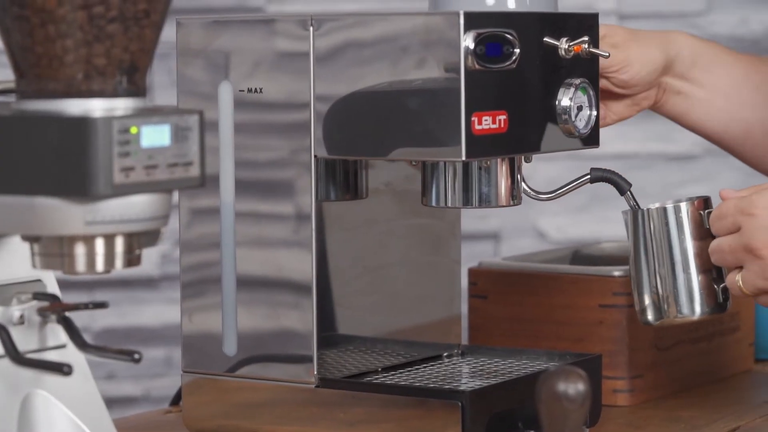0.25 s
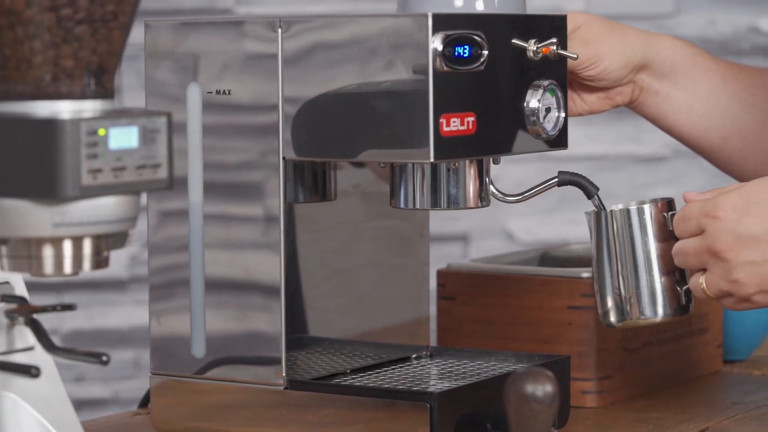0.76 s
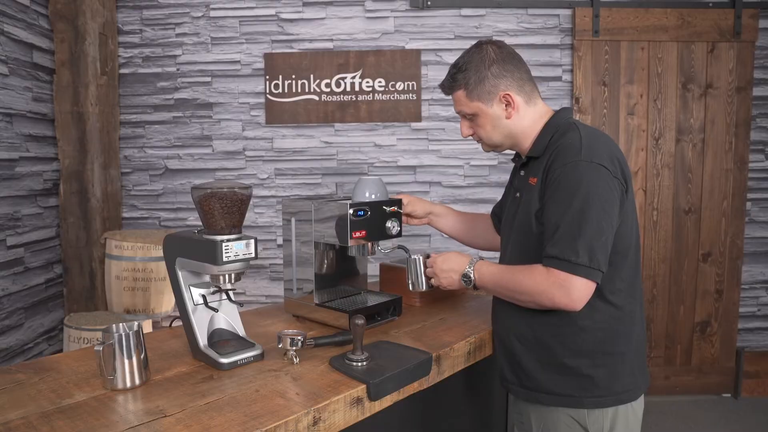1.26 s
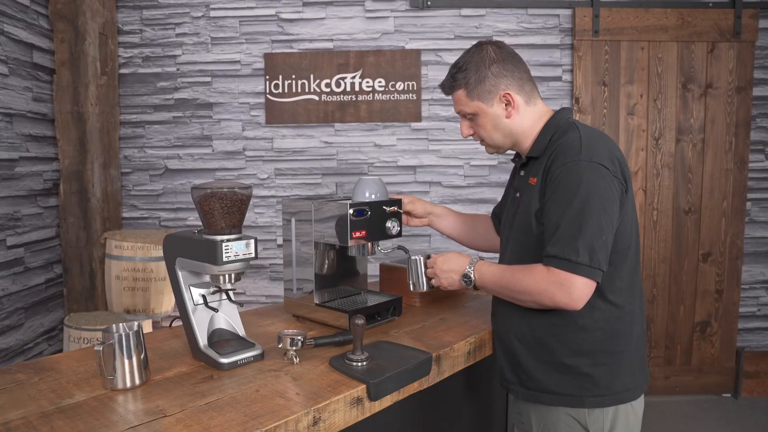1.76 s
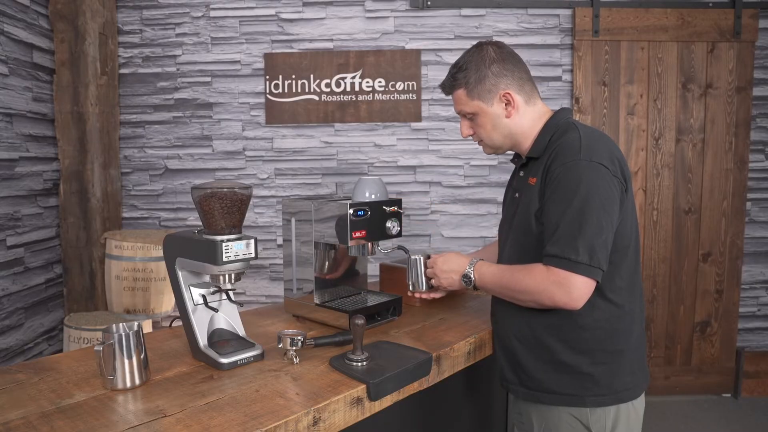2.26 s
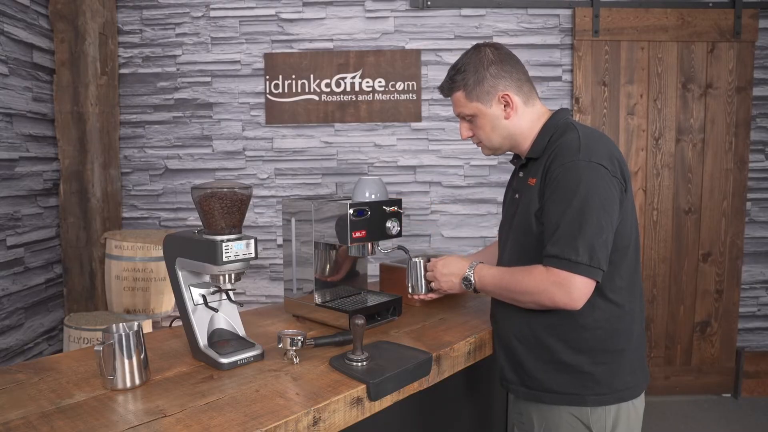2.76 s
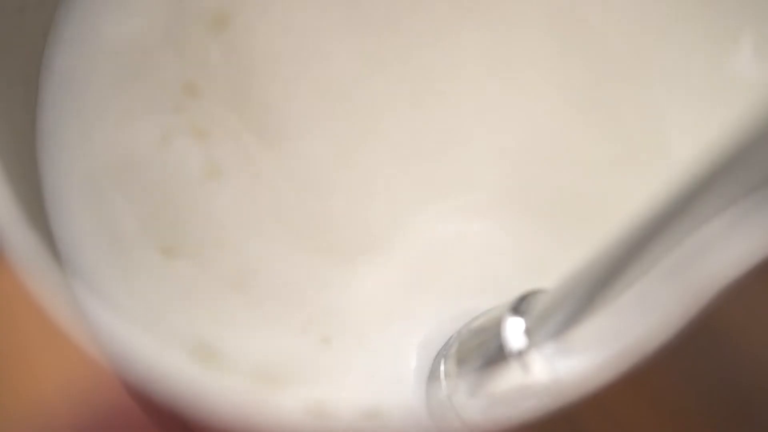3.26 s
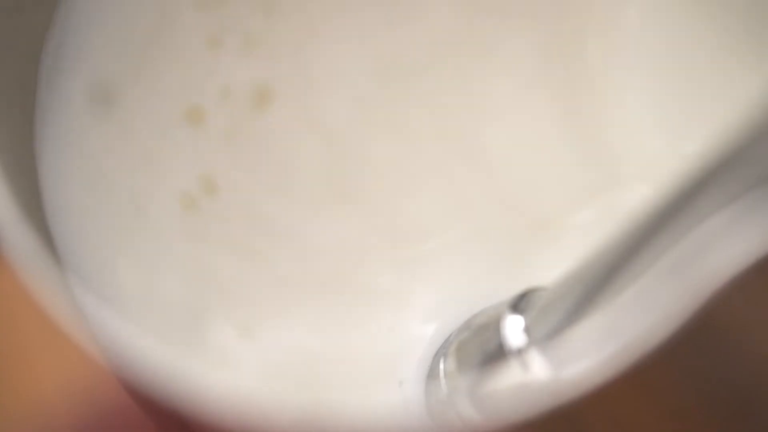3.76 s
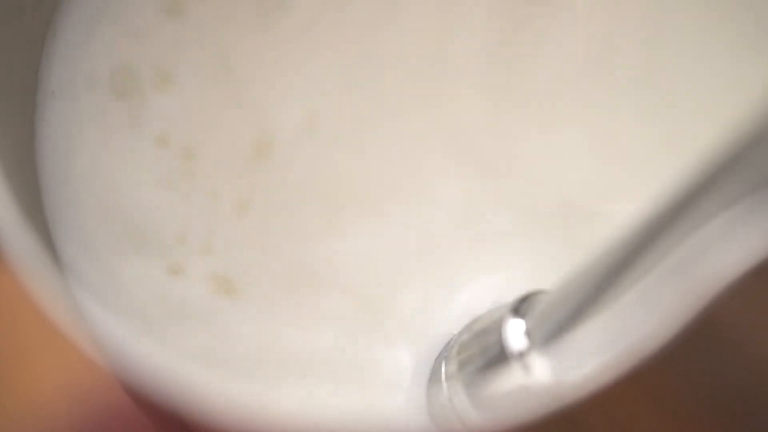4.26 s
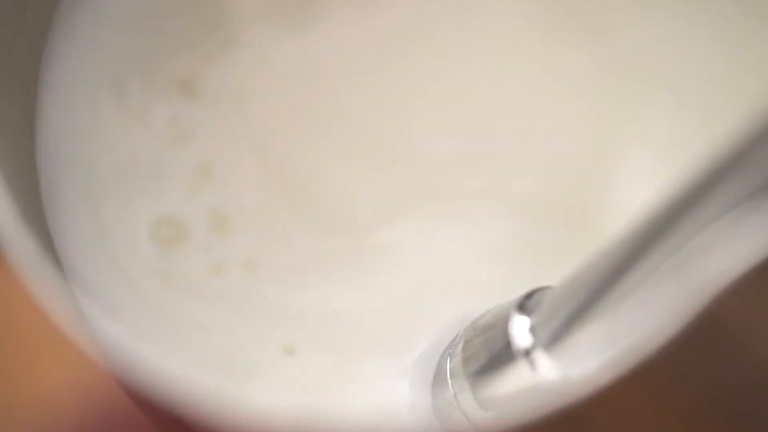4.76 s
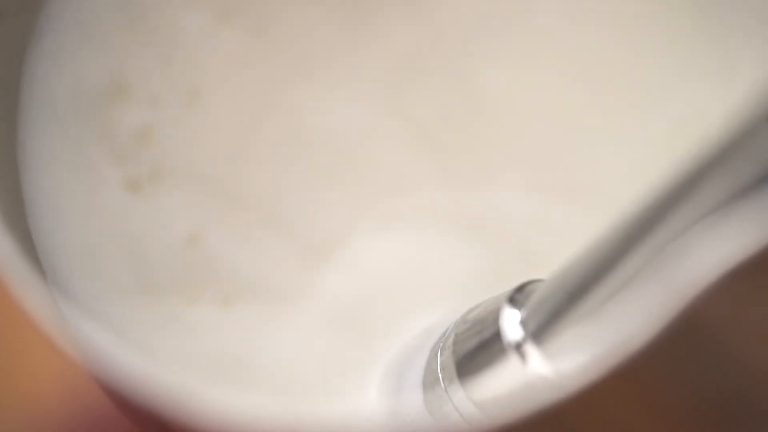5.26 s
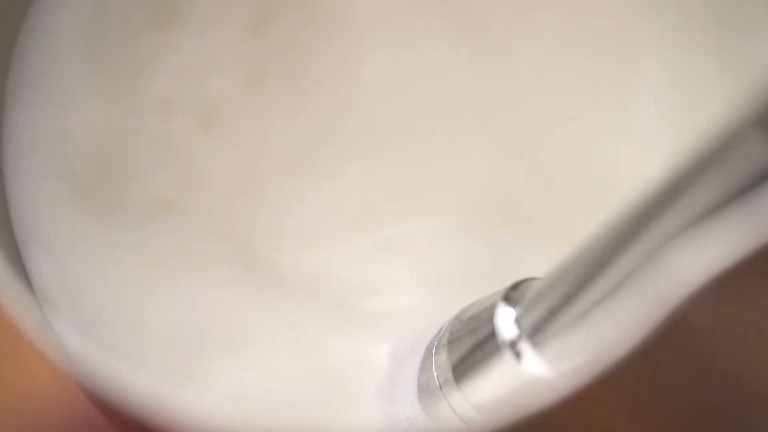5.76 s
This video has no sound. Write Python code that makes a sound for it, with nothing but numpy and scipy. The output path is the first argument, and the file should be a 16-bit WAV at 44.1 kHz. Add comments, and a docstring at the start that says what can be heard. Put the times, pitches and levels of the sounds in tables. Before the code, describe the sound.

Milk being frothed, heard dry and close with little room echo. Over a second of near silence holds a few watery blips ringing faintly on steel. Then rapid deep gulps, rough hiss and an unsteady tearing squeal fill the pitcher, loudest around two seconds. The squeal rises and breaks into pieces, a sharp spit cracks midway, and the steam grows thinner and quieter. It cuts off, leaving a low hush with isolated ticks and bubble pops.

```python
"""A faint hush, a spit and a few rising bubbles, then a steam wand froths milk in a steel pitcher, heard
close up in a quiet kitchen. Sputtering shaped noise is the hiss; a noise-driven resonance that wanders and
jumps in pitch is the steam pocket singing at the tip. Gulps of air are gliding, decaying sines that stir the
pitcher's two hollow resonances. The tip sinks, the tone stops, and single spits break a faint simmer."""
import sys
import numpy as np
from scipy import signal
from scipy.io import wavfile
from scipy.ndimage import uniform_filter1d, map_coordinates

SR = 44100
rng = np.random.default_rng(int(sys.argv[2]) if len(sys.argv) > 2 else 0)


def natural_amplitude(level_db):
    """Convert a level in decibels to a linear amplitude factor, elementwise."""
    exponent = np.asarray(level_db, float) / 20
    return 10 ** exponent


def unload_audio(sound):
    """Save the sound as a 16-bit wav file, at the path given as the first command line argument."""
    columns = np.transpose(np.atleast_2d(sound))
    # keep every value between -1 and 1, then stretch to whole-number steps
    steps = np.round(np.clip(columns, -1, 1) * 32767)
    wavfile.write(sys.argv[1], SR, steps.astype(np.int16))


N = 264864
SHUT_S = 4.968  # the tip goes under; only the simmer hisses on

# Valve cracking open. Each row: time in seconds, roar level in dB, fizz level in dB.
LEAK = [(0, -80, -78), (.55, -77, -77), (.62, -69, -67.5), (1.19, -63, -57.5)]
# Gulps of air. Each row: start in seconds, level in dB, settled pitch in Hz, share by which the pitch falls
# (negative: rises), lower hollow's kick in dB over the gulp.
GULPS = [(1.273, -12.5, 846, 0.14, -11), (1.281, -12, 704, .25, 0.5), (1.31, -12, 1193, .1, -11),
         (1.42, -16.5, 777, 0.26, -24), (1.473, -6, 1215, 0.11, -36), (1.498, -6, 1289, 0.093, -33),
         (1.551, -5.5, 1121, 0.18, 0.5), (1.674, -8, 820, 0.13, -18), (1.698, 0.5, 1407, -0.24, -29),
         (1.809, -4.5, 965, 0.35, 1.5), (1.889, -0.5, 1457, -0.18, -23), (2.025, 0, 1252, 0.042, -14),
         (2.066, 5.5, 1362, -0.057, -22), (2.241, 2.5, 1182, 0.262, -13), (2.299, 0.5, 1221, 0.091, -18.5),
         (2.52, 3.5, 1045, 0.36, -7.5), (2.56, -2, 1300, -0.07, -38), (3.157, -20.5, 1282, .05, -51),
         (3.763, -27, 1370, .05, -38), (3.885, -28.5, 1190, 0.053, -22)]
# Noise spectra of roar and fizz. Each row: frequency in Hz, relative density in dB per Hz.
ROAR_SPECTRUM = [(970, -31), (1650, -9.5), (1920, -6.5), (2030, 5.5), (2310, -2), (2740, -1), (3410, -2.5),
                 (5190, 0), (6290, -10.5), (6920, -8), (8500, -20), (11000, -41), (18700, -120)]
FIZZ_SPECTRUM = [(2350, -85.5), (4000, -9), (4570, -13.5), (4960, -12), (5500, 2), (6290, -6.5), (7620, 2),
                 (8650, -4.5), (9770, 3.5), (11500, -9.5), (12200, -4), (13100, -21), (13900, -9),
                 (14700, -10.5), (16000, -29.5)]


def unit(x):
    """Scaled to rms 1."""
    return x / np.sqrt(np.mean(np.abs(x) ** 2) + 1e-20)


def along(points, hz):
    """Interpolates (Hz, value) points on a log frequency axis."""
    point_hz, value = np.transpose(points)
    return np.interp(np.log(hz + 1), np.log(point_hz + 1), value)


def curves(rows):
    """One value per sample for each column after the time."""
    time_s, *columns = np.transpose(rows)
    return [np.interp(np.arange(N) / SR, time_s, column) for column in columns]


def wobble(rate_hz):
    """A smooth random curve with rate_hz knots a second."""
    knots = rng.standard_normal(int(N * rate_hz / SR) + 4)
    return map_coordinates(knots, [np.arange(N) * rate_hz / SR])


def rush(spectrum, patchy_db):
    """Coloured noise of rms 1 with time-frequency patches of random gain."""
    hz, _, z = signal.stft(rng.standard_normal(N), SR, nperseg=512)
    field = rng.standard_normal(z.shape)
    for axis in (0, 1):
        field = uniform_filter1d(field, size=5, axis=axis)
    z = z * natural_amplitude(along(spectrum, hz)[:, None] + patchy_db * unit(field))
    return unit(signal.istft(z, SR, nperseg=512)[1][:N])


def sing(hz, width_hz, waver):
    """Turbulence through a resonance that follows hz and trembles by the share waver: a ragged phasor."""
    trembling_hz = hz * (1 + waver * wobble(50) + .6 * waver * wobble(130))
    turns = np.cumsum(trembling_hz) / SR
    pole = np.exp(-np.pi * width_hz / SR)
    drive = rng.standard_normal(N) + 1j * rng.standard_normal(N)
    ragged = signal.lfilter([1], np.poly([pole, pole ** 3]), drive)
    return unit(ragged) * np.exp(2j * np.pi * turns)


def jet():
    """Steam tears into the milk: roar, chirping bubbles and brighter fizz sputter together over a churn."""
    # Each row of the two spectra: frequency in Hz, relative density in dB per Hz.
    simmer_spectrum = [(970, -43), (1650, -18), (1930, -13), (2790, 2.5), (3080, -1.5), (3760, -6),
                       (5280, 5), (6360, -11), (6970, -2.5), (8150, -25.5), (9000, -10.5), (11700, -48.5),
                       (19800, -120)]
    churn_spectrum = [(18, -44), (30, -27.5), (199, -8), (226, -30.5), (572, -10.5), (650, -13.5),
                      (840, -25.5), (1430, -120)]
    # Nozzle hiss as the tip breaks out. Each row: time in seconds, level in dB.
    shrill_rows = [(4.72, -86.5), (4.745, -41), (4.78, -65.5), (4.865, -59), (4.88, -29.5), (4.955, -38),
                   (4.965, -90)]
    sink_s, sink_takes_s = 3, 1  # the foam rises round the tip
    roar_db, fizz_db = steam()
    t = np.arange(N) / SR
    sunk_rad = np.clip((t - sink_s) / sink_takes_s, 0, 1) * np.pi / 2
    lively = np.where(t < SHUT_S, 1 - 0.36 * sunk_rad, .25)
    sputter_db = lively * (0.59 * wobble(12) + 1.7 * wobble(25.046) + 2.8 * wobble(110))

    open_roar = np.cos(sunk_rad) * rush(ROAR_SPECTRUM, patchy_db=3.2)
    sunken_roar = np.sin(sunk_rad) * rush(simmer_spectrum, patchy_db=2.5)
    torn = natural_amplitude(-6 - 6 * sunk_rad) * (t < SHUT_S) * chirps(count=2400)
    roar = natural_amplitude(roar_db + sputter_db) * (open_roar + sunken_roar + torn)

    fizz_gain = natural_amplitude(fizz_db + 1.04 * sputter_db + 2.3 * wobble(300))
    fizz = fizz_gain * rush(FIZZ_SPECTRUM, patchy_db=4.5)
    shrill_db, = curves(shrill_rows)
    shrill = natural_amplitude(shrill_db + sputter_db) * sing(14500, width_hz=900, waver=.01).real
    churn_db = .5 * roar_db - 57.5 + 1.3 * wobble(3.5)  # the milk whirls harder with more steam
    churn = natural_amplitude(churn_db) * rush(churn_spectrum, patchy_db=3)
    return roar + fizz + shrill + churn


def steam():
    """Roar and fizz level of the jet in dB, from the first leak to the simmer."""
    # Jet with the valve open. Each row: time in seconds, roar level in dB, fizz level in dB.
    jet_rows = [(1.2, -48, -58), (1.29, -37, -57.5), (1.32, -25, -36.5), (1.36, -45, -56),
                (1.46, -31.5, -46), (1.48, -17, -31), (1.55, -19, -25.5), (1.58, -33.5, -45.5),
                (1.64, -28, -42.5), (1.71, -19.5, -27.5), (1.74, -24, -29.5), (1.81, -22, -24),
                (1.85, -31, -40), (2.03, -24, -22.5), (2.06, -28.5, -34.5), (2.21, -26.5, -21.5),
                (2.27, -29.5, -35), (2.53, -19.5, -25.5), (2.56, -26, -38), (2.66, -23, -27),
                (2.87, -35.5, -41), (2.98, -24.5, -24), (3.06, -22.5, -30), (3.26, -45.5, -39.5),
                (3.33, -24, -24.5), (3.36, -30.5, -34), (3.41, -20.5, -29.5), (3.47, -29.5, -18.5),
                (3.49, -28.5, -40), (3.58, -28, -34), (3.61, -32.5, -49.5), (3.84, -39, -37),
                (3.9, -29, -38.5), (3.99, -34, -54), (4.38, -34.5, -44.5), (4.58, -38, -45),
                (4.67, -34, -48.5), (4.96, -36, -32)]
    simmer_db, simmer_fizz_db = -56, -62.5
    return curves([*LEAK, *jet_rows, (SHUT_S, simmer_db, simmer_fizz_db)])


def chirps(count):
    """Small bubbles torn off the jet: each a few milliseconds long, its pitch sweeping fast, mostly upward."""
    when, pitch, sweep, size, life = rng.random((count, 5)).T[..., None]
    t = np.arange(SR // 40) / SR
    start_hz, sweep_per_s = 2200 * 3.2 ** pitch, 45 * sweep - 12
    turns = start_hz * (t + sweep_per_s * t ** 2 / 2)
    life_s = .002 + .003 * life
    shape = t / life_s * np.exp(-t / life_s)
    grain = natural_amplitude(-3.5 * np.log(1 - size)) * np.sin(2 * np.pi * turns) * shape
    where = (when * N).astype(int) + np.arange(len(t))
    return unit(np.bincount(where.ravel(), grain.ravel())[:N])


def pocket():
    """The steam pocket swells and collapses unevenly: a torn, wandering tone with two ragged overtones."""
    # Each row: time in seconds, pitch in Hz, level in dB (both before the gulps lower them).
    pocket_rows = [(1.702, 1767, -25), (1.752, 1930, -10), (1.87, 1802, -27.5), (1.929, 1968, -13),
                   (2.011, 2193, -16.5), (2.074, 1902, -13), (2.139, 2180, -14), (2.184, 2003, -17.5),
                   (2.311, 1875, -14.5), (2.42, 2200, -13.5), (2.504, 2220, -16.5), (2.6, 1878, -12),
                   (2.681, 1953, -14.5), (2.712, 2370, -18), (2.769, 2560, -16.5), (2.86, 2770, -27.5),
                   (2.899, 2714, -16), (3.036, 2147, -19), (3.11, 2694, -17.5), (3.2, 2750, -18.5),
                   (3.28, 2980, -19.5), (3.3, 2797, -31.5), (3.32, 2763, -20.5), (3.402, 2386, -17.5),
                   (3.446, 2710, -31), (3.491, 2500, -59), (3.515, 2293, -15.5), (3.58, 2205, -33),
                   (3.7, 2833, -16.5), (3.74, 2857, -36), (3.77, 2670, -15), (3.84, 2662, -34),
                   (3.9, 2310, -14.5), (3.952, 2857, -26.5), (4.03, 2900, -39), (4.171, 2750, -63),
                   (4.19, 2740, -27.5), (4.289, 2585, -36.5), (4.501, 2860, -42.5), (4.78, 2786, -25),
                   (4.87, 2726, -32), (4.89, 2680, -52), (4.949, 2570, -54)]
    # Each row: time in seconds, tremble as a share of the pitch.
    tremble_rows = [(1.7, .03), (2.1, .021), (2.7, .017), (3.95, .015), (4.1, .014)]
    collapse_db, regrow_t60_s = 16, .22  # a gulp bursts the pocket; it sings again soon after
    swell = .08  # share by which a gulp lowers the note before it climbs back
    hz, db = curves([(1.68, 1700, -110), *pocket_rows, (SHUT_S, 2600, -110)])
    tremble, = curves(tremble_rows)
    burst = np.minimum(after_gulps(1, .002, regrow_t60_s), 1)
    db = db - collapse_db * burst
    hz = hz * (1 - swell * burst)
    hz = hz * (1 + 2.5 * tremble * tears(70))

    tone = sing(hz, width_hz=70, waver=.6 * tremble)
    # the octave speaks best near the pitcher's treble resonance
    favour_db = -27 * np.abs(np.log2(2 * hz / 5100))
    second = natural_amplitude(-5 + favour_db + 4.5 * wobble(45)) * sing(2 * hz, width_hz=190, waver=tremble)
    third = natural_amplitude(-20 + 5.5 * wobble(30)) * sing(3 * hz, width_hz=260, waver=tremble)
    flutter_db = 1.5 * wobble(14) + 3 * wobble(40)
    return natural_amplitude(db + flutter_db) * (tone + second + third).real


def tears(rate_hz):
    """A sawtooth of rms 1: at random moments the pocket splits, the pitch jumps and then slides on."""
    cuts = np.cumsum(rng.exponential(1, int(2 * N * rate_hz / SR))) * SR / rate_hz
    piece = np.searchsorted(cuts, np.arange(N))
    start, slope = rng.standard_normal((2, len(cuts) + 1))[:, piece]
    since = np.arange(N) - np.r_[0, cuts][piece]
    return unit(start + (.5 + slope) * (since * rate_hz / SR - 1))


def pitcher():
    """Turbulence keeps two hollow resonances humming and gulps stir them; they blur, then only hush."""
    # Each row: time in seconds, lower pitch in Hz, lower hum in dB over the roar, upper hum in dB over the roar.
    hollow_rows = [(1.2, 900, -23, -26), (1.28, 720, 0.5, 0.5), (1.58, 860, 1.5, 6), (1.72, 830, 12.5, -3),
                   (1.79, 830, -40, -3), (1.92, 710, -13, -1), (2.05, 800, -9, 3), (2.5, 780, -14, -1.5),
                   (2.85, 760, -13.5, -0.5), (3.1, 765, -14, -2.5), (3.35, 745, -17.5, -4.5),
                   (4.2, 795, -37, -10), (4.93, 800, -23, -3)]
    # The hollows once the milk rests. Each row: frequency in Hz, relative density in dB per Hz.
    still_spectrum = [(500, -46), (650, -7), (760, -5.5), (950, -6.5), (1150, -3), (1300, 1.5), (1450, -10),
                      (1800, -10.5), (2400, -13.5), (3500, -41.5)]
    upper_hz, upper_strays, still_db = 1278, .03, -52.5
    bloom_s, low_t60_s, high_t60_s = 0.004, 0.25, 0.23
    kick_db, miss_db_per_octave = -8.5, 14  # the upper one answers gulps near its own pitch
    t = np.arange(N) / SR
    roar_db, _ = steam()
    low_hz, low_db, high_db = curves(hollow_rows)
    _, gulp_db, gulp_hz, _, stir_db = np.transpose(GULPS)
    near_db = kick_db - miss_db_per_octave * np.abs(np.log2(gulp_hz / upper_hz))
    low_gain = natural_amplitude(roar_db + low_db) + after_gulps(natural_amplitude(gulp_db + stir_db), bloom_s, low_t60_s)
    high_gain = natural_amplitude(roar_db + high_db) + after_gulps(natural_amplitude(gulp_db + near_db), bloom_s, high_t60_s)

    blur = 1 + 1.5 * np.clip(t - 4, 0, 1)
    low = low_gain * natural_amplitude(1.8 * wobble(30.02)) * sing(low_hz, width_hz=30.3, waver=0.019 * blur)
    straying_hz = upper_hz * (1 + upper_strays * wobble(11))
    high_tone = sing(straying_hz, width_hz=99.6, waver=0.01445 * blur)
    high = high_gain * natural_amplitude(0.9 * wobble(30)) * high_tone
    moving = np.clip((SHUT_S - t) / .02, 0, 1)
    still = natural_amplitude(still_db) * rush(still_spectrum, patchy_db=4.5)
    return moving * (low + high).real + (1 - moving) * still


def after_gulps(gains, rise_s, t60_s):
    """An envelope that swells at each gulp and dies away."""
    kicks, t = np.zeros(N), np.arange(SR // 2) / SR
    kicks[np.round(np.transpose(GULPS)[0] * SR).astype(int)] = gains
    swelling = (1 - np.exp(-t / rise_s)) * natural_amplitude(-60 * t / t60_s)
    return np.abs(signal.fftconvolve(kicks, swelling)[:N])


def gulps():
    """A gulp's note glides with hardly any thump; a bursting bubble is shorter, steady and thumps more."""
    # Large bubbles bursting on the surface. Each row: start in seconds, level in dB, pitch in Hz,
    # thump in dB over the note.
    plop_rows = [(3.46, -25, 1150, -3), (3.886, -38, 1879, -12.5), (4.93, -28, 1367, -11),
                 (5.091, -22.5, 1292, -26), (5.344, -37.5, 744, -20), (5.347, -34.5, 1150, -20.5),
                 (5.771, -22.5, 1310, -27), (5.774, -36, 710, -23), (5.913, -30.5, 1215, -13.5)]
    gulp_t60_s, plop_t60_s, glide_s, gulp_thump_db = 0.086, 0.032, .008, -48
    out, t = np.zeros(N + SR), np.arange(SR // 10) / SR
    slosh_band = signal.butter(2, [170, 750], "band", fs=SR)
    events = [(s, db, hz, fall, gulp_thump_db, gulp_t60_s) for s, db, hz, fall, _ in GULPS]
    events += [(s, db, hz, 0, thump_db, plop_t60_s) for s, db, hz, thump_db in plop_rows]
    for s, db, hz, fall, thump_db, t60_s in events:
        turns = np.cumsum(hz * (1 + fall * np.exp(-t / glide_s))) / SR
        note = natural_amplitude(-60 * t / t60_s) * np.sin(2 * np.pi * turns) * (1 - np.exp(-t / 0.00088))
        slosh = unit(signal.lfilter(*slosh_band, rng.standard_normal(len(t))))
        thump = natural_amplitude(thump_db) * slosh * (t / 0.0038) * np.exp(1 - t / 0.0041)
        out[round(s * SR):][:len(t)] += natural_amplitude(db) * (note + thump)
    return out[:N] * natural_amplitude(1.9 * wobble(200))


def bubbles():
    """Each bubble's pitch climbs as it nears the surface; its splash raps the steel wall, which rings on."""
    # Each row: start in seconds, level in dB (the note is 1 dB lower), pitch in Hz at 10 ms,
    # climb as a share per second, splash in dB over the level.
    bubble_rows = [(0.319, -39, 950, 2.2, -7.5), (0.355, -37, 822, 11, -20), (0.379, -44, 870, 11, -13),
                   (0.471, -52, 1340, 1.8, -3), (0.56, -36.5, 930, 3.6, -1), (0.6, -39, 970, 1.7, -7.5),
                   (0.657, -29.5, 899, 18, -22.5), (0.679, -31.5, 908, 13, -6.5),
                   (0.736, -24.5, 870, 8.7, -20), (0.759, -36.5, 897, 2.9, -4),
                   (0.789, -37, 702, 15.5, -16), (0.809, -53, 850, 11, -12), (0.945, -55, 940, 1.9, -6),
                   (1.061, -27.5, 919, 3.2, 0.5), (1.084, -41.5, 850, 2.4, -9), (1.119, -46.5, 910, 2.9, 0),
                   (1.209, -50, 935, 1.9, 6), (1.234, -50, 900, 2.2, -13)]
    # Each row: frequency in Hz, relative density in dB per Hz.
    splash_spectrum = [(150, -57.5), (400, -13), (600, -12), (900, 7), (1300, -5), (1700, -20.5),
                       (2400, -26), (4000, -45), (9000, -47)]
    # Ringing modes of the pitcher wall. Each row: frequency in Hz, gain in dB, t60 in seconds.
    steel_modes = [(938.5, -47.5, 0.22), (1966, -45, 0.71), (3030, -62, .3), (3800, -61.5, .5),
                   (4600, -50, .6), (5400, -53.5, 0.45)]
    leak_rings_db = 9  # the first thin jet keeps the cold wall singing
    notes, splash, t = np.zeros(N + SR), np.zeros(N + SR), np.arange(SR // 10) / SR
    splash_decay = natural_amplitude(-60 * t / 0.16) + 0.76 * natural_amplitude(-60 * t / 0.0069)
    splash_shape = splash_decay * (1 - np.exp(-t / 0.0022))
    for s, db, hz, climb, splash_db in bubble_rows:
        turns = np.cumsum(hz * (1 + climb * (t - .01))) / SR
        ring = natural_amplitude(-1.0 - 60 * t / 0.11) * np.sin(2 * np.pi * turns) * (1 - np.exp(-t / 0.0023))
        notes[round(s * SR):][:len(t)] += natural_amplitude(db) * ring
        splash[round(s * SR):][:len(t)] += natural_amplitude(db + splash_db) * splash_shape
    notes = notes[:N] * natural_amplitude(4.7 * wobble(160))  # neighbours jostle the bubble
    splash = splash[:N] * natural_amplitude(2.7 * wobble(280)) * rush(splash_spectrum, patchy_db=6.5)

    t = np.arange(SR) / SR
    steel = sum(natural_amplitude(db - 60 * t / t60_s) * np.sin(2 * np.pi * hz * t) for hz, db, t60_s in steel_modes)
    _, fizz_db = steam()
    leaking = np.arange(N) / SR < LEAK[-1][0]
    leak = natural_amplitude(fizz_db + leak_rings_db) * leaking * rush(FIZZ_SPECTRUM, patchy_db=2.5)
    return notes + splash + signal.fftconvolve(splash + leak, steel)[:N]


def spits():
    """The tip breaks the surface for an instant: spatter that starts at once and shuts quickly."""
    # Each row: start in seconds, fizz level in dB before an 8 dB cut, length in seconds, roar in dB over the fizz.
    spit_rows = [(0.159, -48.5, 0.0053, 5), (0.557, -55.5, 0.026, 7.5), (0.799, -54, 0.04, 8.5),
                 (0.921, -37.5, 0.01, -24), (0.942, -39, 0.01, -7), (1.054, -46, 0.042, 16.5),
                 (1.092, -35.5, 0.03, 9.5), (1.22, -47, 0.035, 8), (1.3182, -23.5, 0.01, -9),
                 (3.3166, -21, 0.028, -24), (3.457, -4, 0.013, -21), (3.512, -16, 0.018, -3),
                 (3.567, -19, 0.012, 4), (4.7325, -25.5, 0.016, -7), (4.878, -21.5, 0.01, -30),
                 (5.0884, -21.5, 0.0074, -20), (5.128, -41, 0.021, -2), (5.2818, -23.5, 0.0076, -12.5),
                 (5.357, -41, 0.014, -6), (5.5494, -50.5, 0.019, 6), (5.622, -44.5, 0.01, 3.5),
                 (5.771, -48, 0.0069, 8), (5.845, -34, 0.011, -17), (5.911, -19.5, 0.016, -22),
                 (5.936, -35.5, 0.046, -9)]
    fizz, roar, t = np.zeros(N + SR), np.zeros(N + SR), np.arange(SR // 8) / SR
    for s, db, length_s, roar_db in spit_rows:
        shut = 1 / (1 + np.exp(np.clip((t - length_s) / .0015, -30, 30)))
        shape = natural_amplitude(db - 8 - 200 * t) * shut * (1 - np.exp(-t / .0007))
        fizz[round(s * SR):][:len(t)] += shape
        roar[round(s * SR):][:len(t)] += natural_amplitude(roar_db) * shape
    spatter = fizz[:N] * rush(FIZZ_SPECTRUM, patchy_db=3) + roar[:N] * rush(ROAR_SPECTRUM, patchy_db=3)
    return natural_amplitude(3.3 * wobble(400)) * spatter


def kitchen(x):
    """Room answer as decaying noise: each frequency dies at its own speed."""
    # Each row: frequency in Hz, t60 in seconds.
    room_t60 = [(200, 0.367), (2000, 0.2), (10000, 0.11)]
    hz, t, z = signal.stft(rng.standard_normal(SR // 2), SR, nperseg=256)
    decay = natural_amplitude(-60 * t / along(room_t60, hz)[:, None])
    tail = signal.istft(z * decay, SR, nperseg=256)[1]
    delayed = np.pad(x, (300, 0))  # samples
    return signal.fftconvolve(delayed, tail / np.linalg.norm(tail))[:N]


def background():
    """Room air as coloured noise, and faint, slightly unsteady hums that come and go."""
    # Each row: frequency in Hz, relative density in dB per Hz.
    air_spectrum = [(18, -74), (30, -27), (48, -15), (103, -3), (239, -8.5), (486, -10.5), (569, -16),
                    (8740, -45.5), (13300, -39.5), (16000, -42)]
    # Each row: frequency in Hz, level in dB before an 8 dB lift, start in seconds, end in seconds.
    hum_rows = [(118.4, -73, 0, 5), (104, -65, 5.22, 5.86), (392, -68, 5.1, 5.8), (318, -69, .85, 1.6)]
    t = np.arange(N) / SR
    out = natural_amplitude(-60.5) * rush(air_spectrum, patchy_db=1.5)
    for hz, db, start_s, end_s in hum_rows:
        fade = np.clip(np.minimum(t - start_s, end_s - t) / 0.046, 0, 1)
        out += natural_amplitude(db + 8) * fade * sing(hz, width_hz=hz / 45, waver=0.0018).real
    return out


def scene():
    """Everything at the pitcher, a little room, the background."""
    near = jet() + pocket() + pitcher() + gulps() + bubbles() + spits()
    return (near + natural_amplitude(-23.0) * kitchen(near) + background())[None]


def top_cut(x):
    """Nothing passes above the cut-off."""
    return signal.sosfilt(signal.butter(12, 16470, fs=SR, output="sos"), x)


def record(dry):
    """The loudest gulps round off against the input's ceiling; a gentle high-pass then thins the bass."""
    rounded = dry / (1 + np.abs(dry / .87) ** 8) ** (1 / 8)
    mix = signal.lfilter(*signal.butter(1, 90, "high", fs=SR), rounded)
    return top_cut(mix)


dry = scene()
out = record(dry)
unload_audio(out)
```